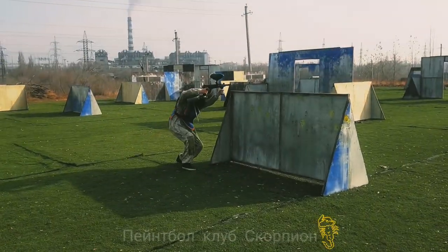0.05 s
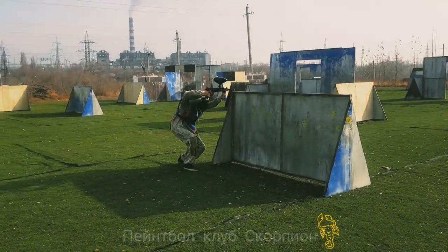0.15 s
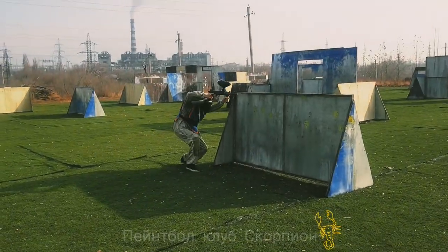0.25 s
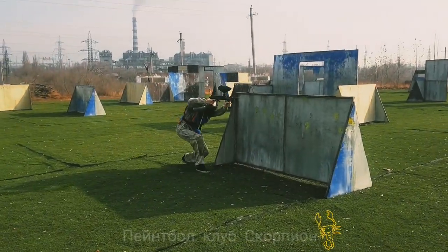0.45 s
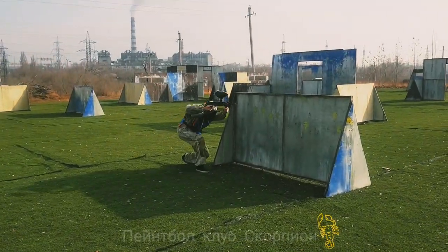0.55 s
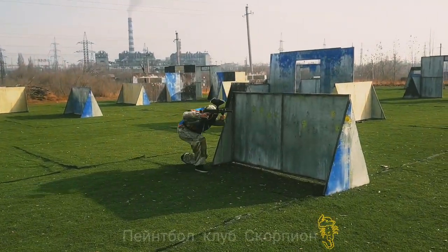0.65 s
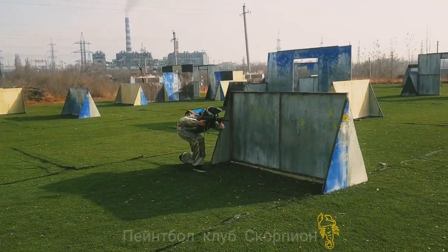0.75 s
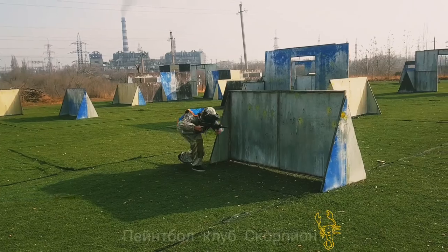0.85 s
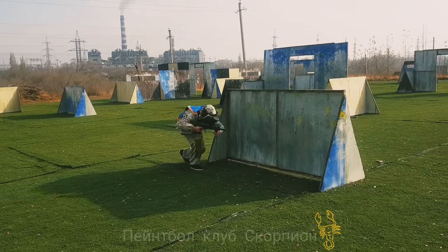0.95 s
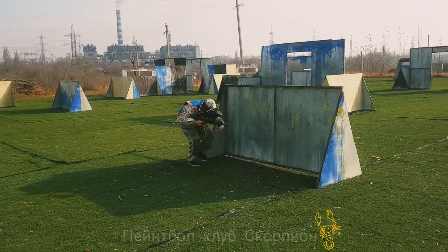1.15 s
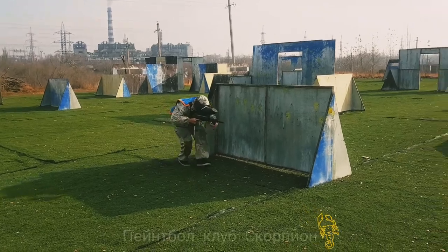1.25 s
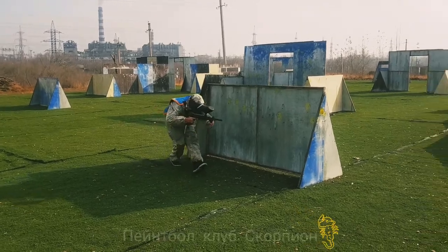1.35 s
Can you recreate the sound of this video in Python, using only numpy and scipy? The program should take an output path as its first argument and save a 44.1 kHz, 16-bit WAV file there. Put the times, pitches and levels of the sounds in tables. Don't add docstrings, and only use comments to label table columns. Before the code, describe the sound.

A close paintball marker shot pops with a hollow crack, then slaps back and fades outdoors.

```python
import sys
import numpy as np
from scipy import signal
from scipy.fft import rfft, irfft
from scipy.io import wavfile
from scipy.ndimage import uniform_filter1d

SR = 44100
rng = np.random.default_rng(int(sys.argv[2]) if len(sys.argv) > 2 else 0)


def linear_from_db(decibels):
    return 10 ** (np.asarray(decibels, float) / 20)


def generate_wav(signal):
    frames = np.transpose(np.atleast_2d(signal))
    scaled = np.clip(frames, -1, 1) * 32767
    pcm = np.round(scaled).astype(np.int16)
    wavfile.write(sys.argv[1], SR, pcm)


N = 61739

BANG_TIMES = [
    .2041,
    .3209,
]
# (tone [Hz], tone level [dB], crack level [dB], thump level [dB])
BANGS = [
    (573, -8, -12.5, -20.5),
    (687, -12, -19, -22.5),
]
LEFT_LAGS = [
    0.,
    .0004,
]
# (hold [s], swell over the hold [dB], t60 [s], upper mode [Hz], its level [dB])
BARREL_RINGS = [
    (0.007, -0.5, 0.0094, 1380, -21.5),
    (0.0033, -1, 0.011, 850, -20.5),
]
# (share at onset [0-1], hold [s], t60 [s])
GAS_JETS = [
    (0.297, 0.0055, .075),
    (.8, 0.0042, 0.0562),
]
# (frequency [Hz], width [Hz], level [dB])
CRACK_MODES = [
    [(2510, 80, -2.5), (2850, 32, -9.5), (3274, 37, -13), (4100, 110, -4), (4563, 35, 4), (5500, 15, -8.5)],
    [(2050, 200, -0.5), (2873, 300, -5.5), (3300, 180, -16), (3620, 80, -17), (4470, 200, -7.5),
     (5330, 160, -7.5)],
]
# (frequency [Hz], level [dB per Hz])
CRACK_COLOUR = [(150, -23), (400, -8.5), (1000, -3), (1400, -9), (1900, -9), (2700, -4), (5000, -17.5),
                (14000, -11.5)]
# (frequency [Hz], likeness [-1 to 1])
CRACK_LIKENESS = [(300, 1), (1500, 0), (5000, 0.16), (9000, 0), (15000, .5)]
# (frequency [Hz], left minus right [dB])
NEAR_BALANCE = [(60, -6), (150, 5.5), (380, -2.5), (950, 2.5), (2380, -4.5), (5980, -19.5), (15000, 1)]
# (frequency [Hz], left minus right [dB])
FIELD_BALANCE = [(60, -1), (150, 2), (380, 7.5), (950, 3), (2380, -11.5), (5980, -14), (15000, 3.5)]
# (frequency [Hz], likeness [-1 to 1])
FIELD_LIKENESS = [(60, 0.99), (180, 0.96), (550, 0.93), (1650, -0.42), (4970, 0.029), (15000, 1)]
# (frequency [Hz], level [dB per Hz])
TAIL_COLOUR = [(60, -2.5), (130, -4.5), (400, -12.5), (670, -8.5), (1400, -13.5), (2900, -13.5),
               (5200, -23.5), (14000, -29)]
# (frequency [Hz], t60 [s])
TAIL_DECAY = [(100, 0.87), (400, 1), (1500, 1.217), (4000, 0.78), (12000, 1)]
# (time [s], level [dB])
TAIL_STARTS = [
    (-.07, -34.5),
    (.215, -35),
    (.36, -50),
]
# (time [s], level [dB], rise [s], t60 [s], tilt [dB per octave])
BARRIER_ECHOES = [(.04, -36, 0.0078, 0.06, 0.5), (.05, -36, 0.0024, 0.035, -1.5),
                  (.222, -30, .002, 0.056, 2.5), (.25, -41, 0.0017, 0.055, 2),
                  (0.298, -32.5, 0.006, 0.24, -4.5), (.385, -38, 0.0033, .3, -1.5),
                  (0.411, -38.5, 0.0041, 0.16, -1), (0.476, -52.5, 0.0062, 0.054, 5.5),
                  (.524, -59, 0.0024, 0.087, 2.5)]
# (time [s], level [dB], frequency [Hz], width [Hz], t60 [s])
SHORT_SOUNDS = [(.093, -44.5, 12300, 6500, 0.033), (0.092, -47, 4830, 3000, 0.031),
                (0.184, -43, 12800, 8200, 0.048), (.183, -43, 4080, 3600, 0.057),
                (.297, -37, 744, 700, 0.022), (0.2909, -32.5, 4230, 4050, 0.026),
                (0.293, -39, 2660, 2500, 0.031), (0.207, -27, 316, 159, 0.061), (0.322, -30, 303, 160, 0.055),
                (0.909, -65, 3300, 2010, 0.063), (.345, -50.5, 12200, 8900, .5),
                (.207, -24.5, 1093, 500, .05), (0.711, -59, 1467, 300, 0.059),
                (.778, -59.5, 1470, 896, 0.045), (.805, -57.5, 2238, 350, 0.027),
                (.833, -55, 870, 704, 0.075), (.908, -57, 1200, 1430, 0.16), (0.936, -54.5, 60, 40.3, 0.55),
                (1.011, -64.5, 12000, 7000, 0.044), (1.2227, -54.5, 1650, 898, 0.027),
                (1.2216, -60, 2613, 900, 0.019), (1.231, -58.5, 5200, 2500, 0.023),
                (1.232, -48, 12300, 10000, 0.013), (1.284, -65.5, 1473, 2010, .07)]
# (start [s], end [s], level [dB], frequency [Hz], width [Hz], rate [grains per s])
BOOT_SCUFFS = [
    (0.68, 1.03, -65.5, 1260, 2430, 1300),
    (0.85, 1.218, -69.5, 1459, 900, 1700),
]
# (frequency [Hz], level [dB per Hz])
RUMBLE_COLOUR = [(30, -1), (55, 0.5), (100, -6), (160, -12.5), (300, -22.5), (500, -27.5), (1000, -38),
                 (3000, -59.5)]
# (frequency [Hz], level [dB rms])
PLANT_HUM = [(50, -61), (100, -65), (200, -63), (298, -75), (398, -70)]
# (frequency [Hz], level [dB per Hz])
HISS_COLOUR = [(300, -2.5), (1400, 1), (2500, -4), (5000, -10.5), (7000, -10.5), (11000, 2.5), (15600, 8.5),
               (16200, -9.5)]
# (frequency [Hz], gain [dB])
MIC_RESPONSE = [(25, -31), (38, -8.5), (55, 0), (5200, -1), (6500, -12), (8300, -19.5), (11000, -8.5),
                (15600, -9.5)]

PITCH_GLIDE, THIRD_HARMONIC_DB = 0.08, -29
UPPER_RISE_S, UPPER_T60_S = 0.0026, 0.039
THUMP_HZ, THUMP_SAG, THUMP_T60_S, THUMP_RISE_S = 122, 0.45, 0.064, 0.0072
TONE_PAN_DB = 3.5
CRACK_BED_DB = -8.5
JET_RISE_S = 0.005
ECHO_TREBLE_DB = -16.5
RUMBLE_DB, RUMBLE_PAN_DB, RUMBLE_SWING_DB = -49.5, 2.2, 2.5
HISS_DB, HISS_LIKENESS = -68.5, 0.79
EDGE_HZ, EDGE_DB_PER_KHZ = 15750, 45


def evened(x):
    return x / np.sqrt(np.mean(x ** 2) + 1e-20)


def read(points, hz):
    f, value = np.transpose(points)
    return np.interp(np.log(hz + 1), np.log(f + 1), value)


def curve(points):
    return lambda hz: read(points, hz)


def flat(value):
    return lambda hz: value + 0 * hz


def add(mix, s, sound):
    part = mix[..., round(s * SR):][..., :sound.shape[-1]]
    part += sound[..., :part.shape[-1]]


def sides(pan_db):
    return linear_from_db(pan_db / 2 * np.array([[1], [-1]]))


def pair(length, colour_db, pan_db, same):
    hz = np.fft.rfftfreq(length, 1 / SR)
    a, b = rfft(rng.standard_normal((2, length)))
    c = np.clip(same(hz), -1, 1)
    left = a * linear_from_db(pan_db(hz) / 2)
    right = (c * a + np.sqrt(1 - c ** 2) * b) * linear_from_db(-pan_db(hz) / 2)
    return evened(irfft(np.array([left, right]) * linear_from_db(colour_db(hz)), length))


def burst(t, rise, t60):
    attack = np.sin(np.pi / 2 * np.clip(t / max(rise, 1e-4), 0, 1))
    return attack * linear_from_db(-60 * np.maximum(t - rise, 0) / t60)


def bump(hz, centre_hz, width):
    return 1 / (1 + (2 * (hz - centre_hz) / width) ** 2)


def barrel_tone(t, hz, tone_db, ring):
    hold, swell_db, t60, upper_hz, upper_db = ring
    phase = 2 * np.pi * hz * (t + PITCH_GLIDE * np.minimum(t, 0.012) ** 2 / 0.012)
    wave = np.sin(phase) - linear_from_db(THIRD_HARMONIC_DB) * np.sin(3 * phase)
    swell = swell_db * np.minimum(t / hold - 1, 0)
    fall = -60 * np.maximum(t - hold, 0) / t60
    upper = linear_from_db(upper_db) * np.sin(2 * np.pi * upper_hz * t) * burst(t, UPPER_RISE_S, UPPER_T60_S)
    return wave * linear_from_db(tone_db + swell + fall) + upper


def low_thump(t, thump_db):
    hz = THUMP_HZ * (1 - THUMP_SAG * (1 - np.exp(-t / 0.0091)))
    cycles = np.cumsum(hz * (t > 0), axis=1) / SR
    return linear_from_db(thump_db) * np.cos(2 * np.pi * cycles) * burst(t, THUMP_RISE_S, THUMP_T60_S)


def gas_crack(t, crack_db, jet, modes):
    share, hold, t60 = jet

    def colour(f):
        peaks = sum(linear_from_db(2 * db) * bump(f, centre, width) for centre, width, db in modes)
        return read(CRACK_COLOUR, f) + 10 * np.log10(linear_from_db(2 * CRACK_BED_DB) + peaks)

    noise = pair(8192, colour, curve(NEAR_BALANCE), curve(CRACK_LIKENESS))
    flow = share + (1 - share) * np.minimum(t / JET_RISE_S, 1)
    flow = flow * np.minimum(t / 0.000095, 1)
    return noise * flow * linear_from_db(crack_db - 60 * np.maximum(t - hold, 0) / t60)


def bang(row, lag, ring, jet, modes):
    hz, tone_db, crack_db, thump_db = row
    t = np.maximum(np.arange(8192) / SR - np.array([[lag], [0]]), 0)
    body = barrel_tone(t, hz, tone_db, ring) + low_thump(t, thump_db)
    return body * sides(TONE_PAN_DB) + gas_crack(t, crack_db, jet, modes)


def shots():
    out = np.zeros((2, N))
    for s, *parts in zip(BANG_TIMES, BANGS, LEFT_LAGS, BARREL_RINGS, GAS_JETS, CRACK_MODES):
        add(out, s, bang(*parts))
    return out


def barrier_echoes():
    out, t = np.zeros((2, N)), np.arange(8192) / SR
    for s, db, rise, t60, tilt_db in BARRIER_ECHOES:
        def colour(f):
            tilt = tilt_db * np.log2(np.clip(f, 150, 5000) / 1000)
            return read(TAIL_COLOUR, f) + tilt + ECHO_TREBLE_DB * (f > 7000)

        noise = pair(8192, colour, curve(FIELD_BALANCE), curve(FIELD_LIKENESS))
        add(out, s, linear_from_db(db) * noise * burst(t, rise, t60))
    return out


def field_tail():
    raw = pair(N + 512, curve(TAIL_COLOUR), curve(FIELD_BALANCE), curve(FIELD_LIKENESS))
    hz, t, z = signal.stft(raw, SR, nperseg=256)
    t60 = read(TAIL_DECAY, hz)[:, None]
    power = 0
    for s, db in TAIL_STARTS:
        onset = np.clip((t - s) / 0.0067, 0, 1)
        power = power + linear_from_db(2 * db - 120 * np.maximum(t - s, 0) / t60) * onset
    patches = uniform_filter1d(rng.standard_normal(power.shape), 5, 0)
    patches = evened(uniform_filter1d(patches, 5, 1))
    return signal.istft(z * np.sqrt(power) * linear_from_db(2.0 * patches), SR, nperseg=256)[1][:, :N]


def short_sounds():
    out, t = np.zeros((2, N)), np.arange(8192) / SR
    for s, db, hz, width, t60 in SHORT_SOUNDS:
        colour = lambda f: 40 * np.log10(bump(f, hz, width))
        shape = burst(t, 1 / hz + 0.0004, t60)
        rattle = shape * pair(8192, colour, curve(FIELD_BALANCE), flat(1.0))
        add(out, s, linear_from_db(db) * evened(rattle) * np.sqrt(np.mean(shape ** 2)))
    return out


def boot_scuff(start, end, db, hz, width, rate):
    t = np.arange(N) / SR
    strength = linear_from_db(2.5 * np.minimum(rng.exponential(1, N), 3))
    hits = (rng.random(N) < rate / SR) * strength
    grains = evened(signal.lfilter([1], [1, -np.exp(-1 / (0.0043 * SR))], hits))
    noise = pair(N, lambda f: 30 * np.log10(bump(f, hz, width)), curve(FIELD_BALANCE), flat(0.5))
    return linear_from_db(db) * noise * grains * np.sin(np.pi * np.clip((t - start) / (end - start), 0, 1))


def slow(top_hz):
    t = np.arange(N) / SR
    return evened(sum(np.sin(2 * np.pi * (f * t + rng.random())) for f in np.geomspace(1, top_hz, 16)))


def distant_plant():
    t = np.arange(N) / SR
    rumble = pair(N, curve(RUMBLE_COLOUR), flat(RUMBLE_PAN_DB), curve(FIELD_LIKENESS))
    hum = np.zeros(N)
    for hz, db in PLANT_HUM:
        hum += linear_from_db(db + 2 + 2 * slow(8)) * np.sin(2 * np.pi * hz * t + 0.5 * slow(6))
    return linear_from_db(RUMBLE_DB + RUMBLE_SWING_DB * slow(25)) * rumble + hum * sides(RUMBLE_PAN_DB)


def microphone_hiss():
    balance = lambda f: 0.71 * read(FIELD_BALANCE, f)
    return linear_from_db(HISS_DB) * pair(N, curve(HISS_COLOUR), balance, flat(HISS_LIKENESS))


def scene():
    near = shots() + barrier_echoes() + field_tail()
    handling = short_sounds() + sum(boot_scuff(*row) for row in BOOT_SCUFFS)
    return near + handling + distant_plant() + microphone_hiss()


def roll_off(x):
    return signal.sosfilt(signal.butter(12, 16660, fs=SR, output="sos"), x)


def record(dry):
    hz = np.fft.rfftfreq(8192, 1 / SR)
    edge_db = np.clip(EDGE_DB_PER_KHZ * (hz - EDGE_HZ) / 1000, 0, 80)
    half = np.log(linear_from_db(read(MIC_RESPONSE, hz) - edge_db))
    full = np.concatenate([half, half[-2:0:-1]])
    taps = np.fft.ifft(np.exp(np.conj(signal.hilbert(full)))).real[:4096]
    mix = signal.oaconvolve(dry, taps[None])[:, :N]
    return roll_off(mix)


dry = scene()
out = record(dry)
generate_wav(out)
```